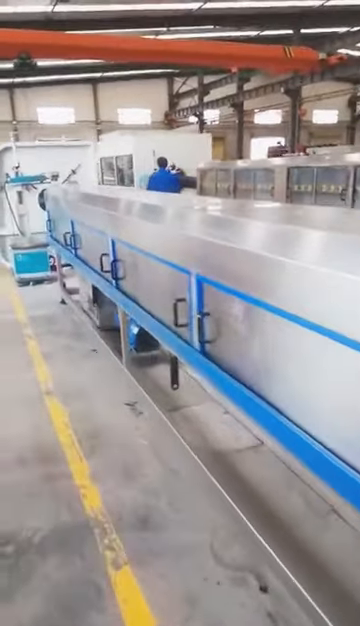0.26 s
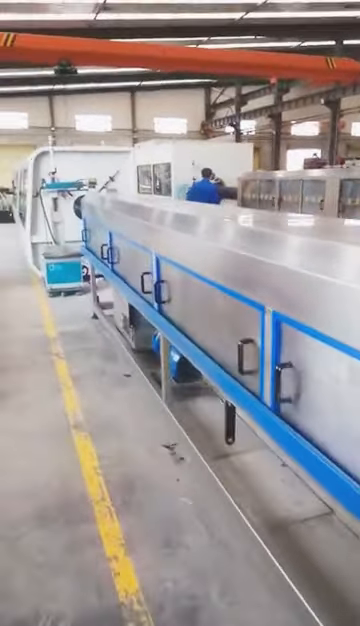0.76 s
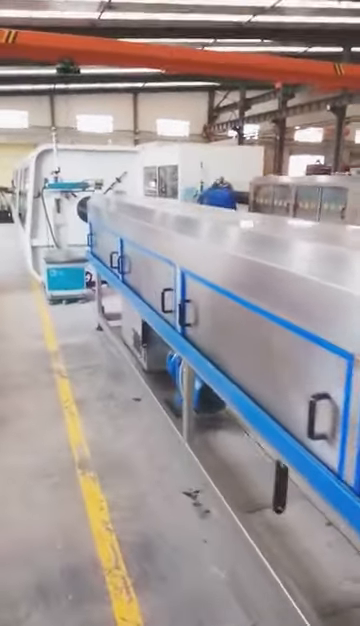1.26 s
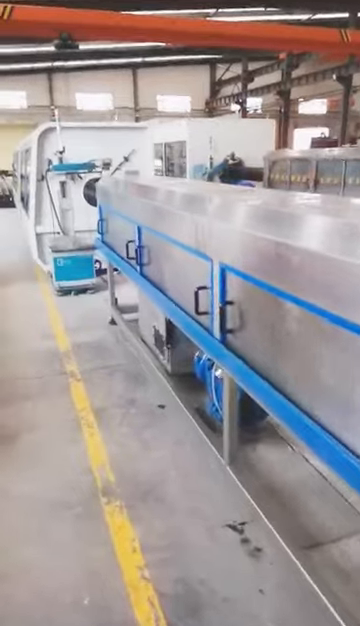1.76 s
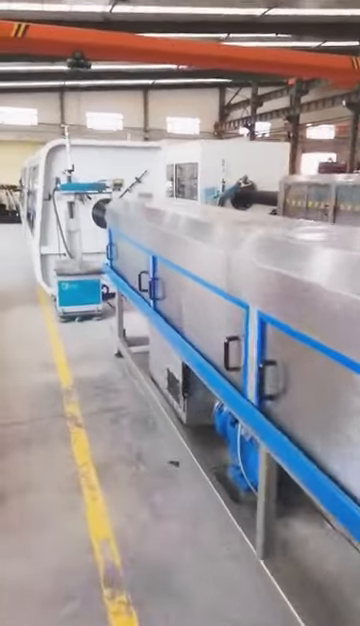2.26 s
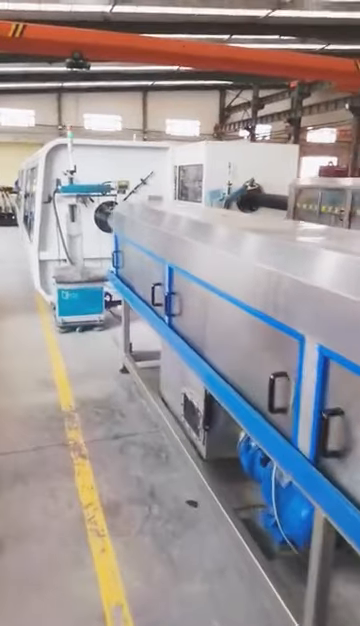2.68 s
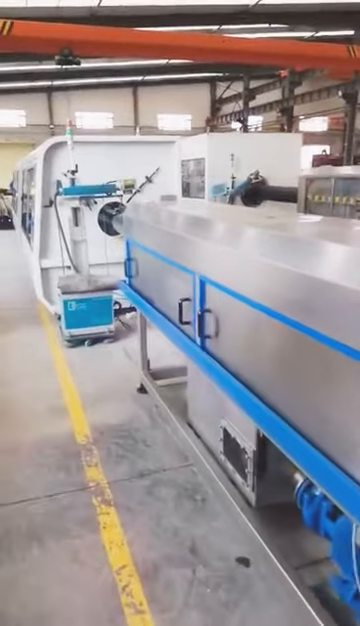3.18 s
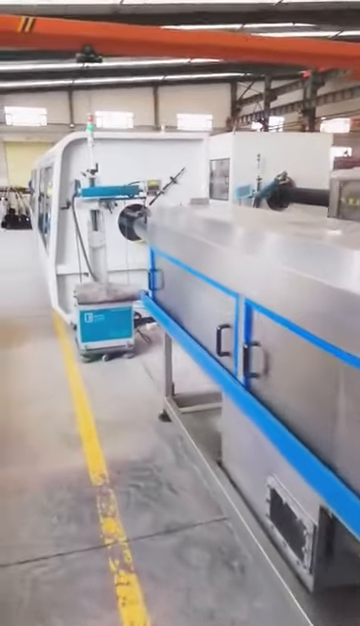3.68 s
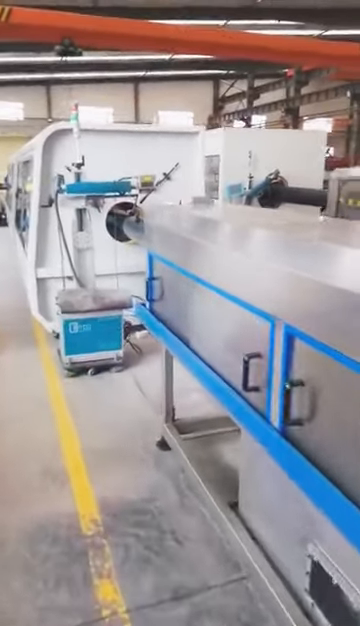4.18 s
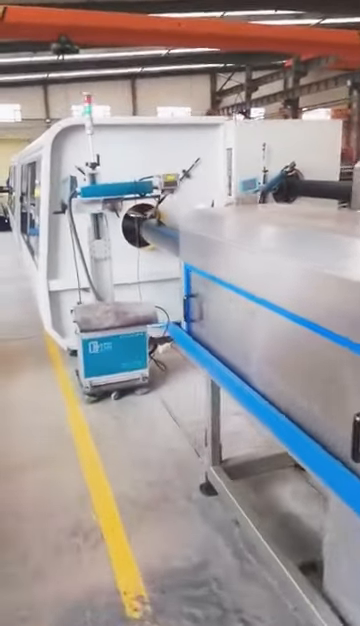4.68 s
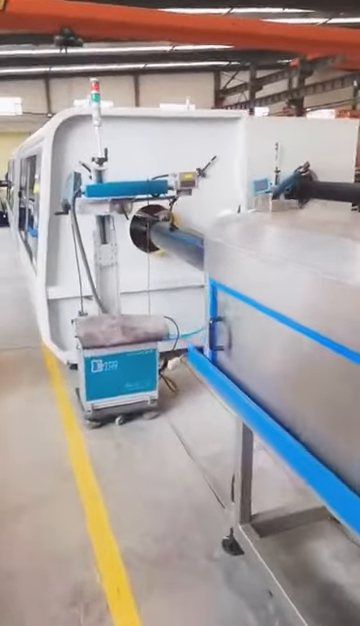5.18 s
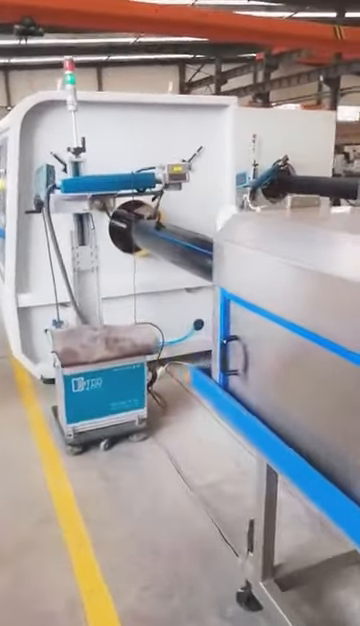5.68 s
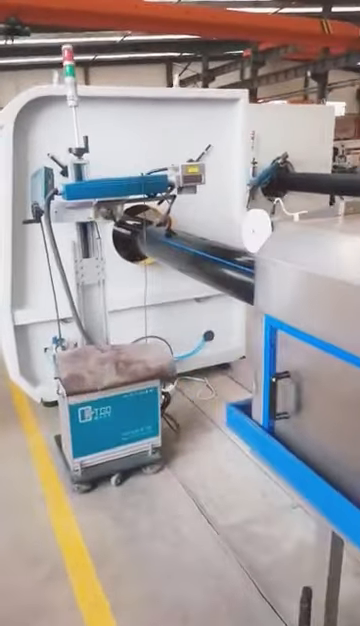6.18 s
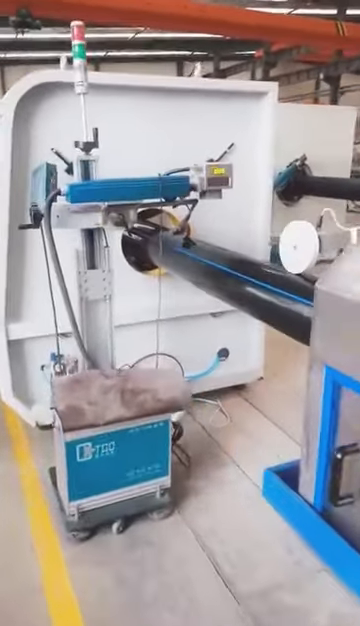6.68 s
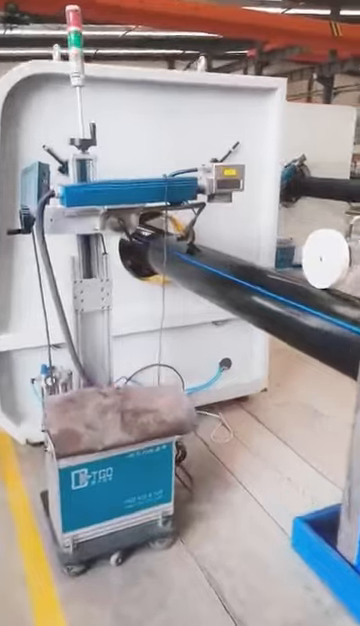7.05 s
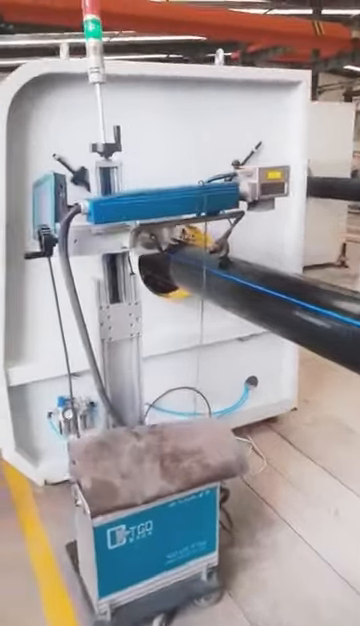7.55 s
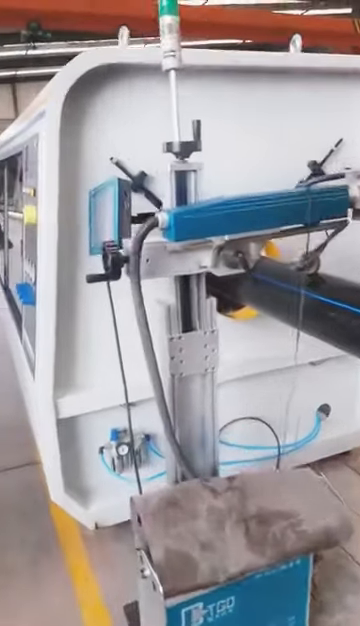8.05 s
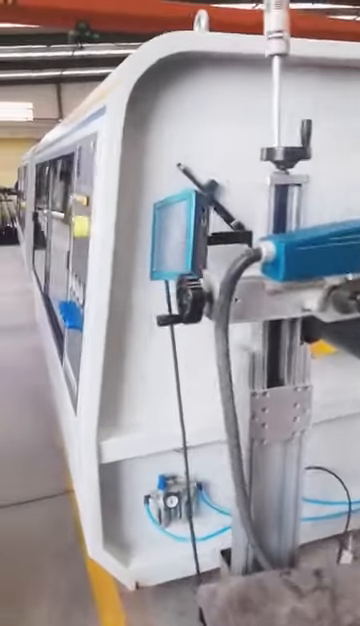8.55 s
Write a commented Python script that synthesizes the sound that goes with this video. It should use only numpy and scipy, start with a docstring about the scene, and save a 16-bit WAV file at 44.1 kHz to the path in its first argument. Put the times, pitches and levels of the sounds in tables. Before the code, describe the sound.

Walking along a pipe production line in a large, hard hall. A constant broad roar of fans, pumps and water spray fills everything from start to end. Over it a clear mid-pitched motor whine rises and dips several times a second, shifting left and right, with lower hums and a faint mains buzz beneath. Handheld stereo phone microphone, left side brighter and hissier.

```python
"""Walk along a pipe extrusion line

A phone is carried along the line in a large hall. Shaped noise makes the roar of fans, pumps and cooling spray,
with patches that grow louder and quieter. Over it, sines make the mains hum and three strong machine tones, which
swell and fade as the walk crosses their reflections; clusters of Doppler-shifted partials make fainter motor and
gear tones that beat. The left microphone is brighter and its port rings in the treble."""
import sys
import numpy as np
from scipy import signal
from scipy.fft import irfft
from scipy.io import wavfile
from scipy.ndimage import map_coordinates

SR = 44100
rng = np.random.default_rng(int(sys.argv[2]) if len(sys.argv) > 2 else 0)


def dump_mix(stems):
    """Bounce the given channels to the path in sys.argv[1] as a 16-bit WAV at rate SR."""
    frames = np.atleast_2d(stems).T  # one column per channel
    limited = np.clip(frames, -1, 1)  # hard clip at full scale
    pcm = np.round(limited * 32767).astype(np.int16)
    wavfile.write(sys.argv[1], SR, pcm)


N = 388962

# Roar of fans, pumps and spray at the right microphone, before its port and the patches.
# Each row: frequency in Hz, level in dB per Hz.
ROAR_SPECTRUM = [(25, -84), (60, -77), (200, -69.5), (350, -66.5), (480, -70), (750, -66), (800, -71),
                 (900, -70), (1450, -81), (1650, -77.5), (1950, -81.5), (2600, -79), (3300, -79.5),
                 (4100, -88)]
# Tone balance of the left microphone over the right, before the ports. Each row: frequency in Hz, gain in dB.
LEFT_OVER_RIGHT = [(60, -2), (170, 1.5), (300, 2.5), (550, 1), (900, 2), (1500, 6), (1950, 2), (2600, 6.5),
                   (3500, 4.5), (6000, 14.5), (7400, 4.5)]
# Likeness of the sound on the two sides. Each row: frequency in Hz, likeness from 0 to 1.
SIDE_LIKENESS = [(50, 0.96), (150, 1), (300, 0.68), (500, 0.64), (700, 0.3), (900, 0.02)]
# Swell of the roar as the walk moves on. Each row: time in seconds, gain in dB.
ROAR_SWELL = [(0, 1.5), (3, 0.23), (6, 0.5), (8.82, -0.1)]
# Mains hum. Each row: time in seconds, level in dB.
MAINS_SWELL = [(0.0, -65.5), (1.26, -58), (1.54, -58.5), (2.88, -54.1), (3.66, -67.3), (4.2, -63.2),
               (4.48, -73.5), (5.44, -64), (6.1, -54), (7.54, -66), (8.38, -56.5), (8.8, -59.5)]
# Multiples of a pump's shaft rate that ring. Each row: multiple of the shaft rate, mean level of the sides in dB.
SHAFT_PARTIALS = [(3, -62), (7, -52), (12, -58.5), (17, -58), (18, -64), (19, -52.5), (21, -55),
                  (24, -53.5), (26, -55.5), (29, -60), (31, -67), (34, -63), (35, -57), (36, -58.5),
                  (41, -69), (44, -68), (46, -67), (49, -62), (51, -58), (52, -64), (53, -66), (54, -56),
                  (56, -66), (57, -65), (61, -65)]
# Fainter tones of other motors and gears. Each row: frequency in Hz, mean level of the sides in dB.
FAINT_TONES = [(245, -54), (292, -52), (377, -57), (401, -54.5), (497, -55), (513, -58), (579, -57),
               (627, -59.5), (729, -52), (992, -56.5), (1024, -64), (1108, -60.5), (1266, -64),
               (1345, -61.5), (1363, -61), (1382, -61), (2595, -63), (2720, -61)]
# The three strong tones at the loud and quiet spots of the walk, before they stray and flutter.
# Each row: time in seconds, level in dB, left over right in dB.
WHINE_SPOTS = [(0.0, -44, -3.0), (0.08, -33.0, 9.0), (0.18, -46, -8), (0.38, -31, 0), (0.54, -39.0, 20),
               (0.88, -41.5, -5.0), (1.18, -33.5, -2.0), (1.4, -28, 4.5), (1.62, -30.5, 5),
               (1.7, -36, -8.0), (2.38, -44, -4), (2.52, -31.5, 3), (2.62, -40.5, -16.0),
               (2.8, -31.5, -8.0), (2.88, -53.0, -14.0), (3.14, -37.0, -15.0), (3.22, -32.5, 8),
               (3.52, -42, 1), (3.68, -29.5, 5.5), (3.9, -61, 20), (3.96, -50, -19.0), (4.12, -30, 14.0),
               (4.2, -52, 7.0), (4.26, -36, -16.0), (4.36, -29, -3.0), (4.56, -50, -19.0),
               (4.84, -31.5, -16.0), (4.94, -28.5, -2.5), (5.06, -34.0, 20), (5.26, -33.5, -5.0),
               (5.5, -40, 20), (5.56, -54, -19.0), (5.66, -30.0, -11), (5.86, -43.5, -2.0),
               (5.96, -44, -19.0), (6.14, -27.0, -1.5), (6.48, -34.0, -5.0), (6.78, -30.0, 0.0),
               (7.02, -42.0, -7), (7.16, -36.5, -11.0), (7.36, -52.0, -2.5), (7.48, -34.5, 0),
               (7.8, -30, 5.0), (7.88, -38, 6.0), (7.96, -29.5, -1.5), (8.06, -41.5, -0.0),
               (8.24, -31, 5.0), (8.34, -34, 5.0), (8.42, -27, -4.0), (8.52, -35, 2.0), (8.62, -33, -21),
               (8.82, -34, -19.0)]
HUM_SPOTS = [(0.0, -55, 6.0), (0.16, -49, 19.0), (0.64, -61.5, 19.0), (0.86, -51, 18), (1.42, -60, 18.5),
             (1.98, -47.5, 3.5), (2.58, -63, 15.0), (2.68, -62.0, -9.0), (3.06, -47.5, 4.0),
             (4.82, -47.5, 10.0), (5.08, -41, 5.0), (6.18, -54.0, -4.0), (6.76, -44.0, 5.0),
             (6.98, -40.5, 2), (7.62, -53, 19.0), (7.82, -64, -11), (8.1, -50.0, -17.0), (8.42, -60, 3.0),
             (8.7, -47.0, 3.0), (8.82, -50, 1.0)]
DRONE_SPOTS = [(0.0, -47, 11.0), (0.18, -63, 13), (0.48, -40.0, 7.0), (0.68, -56, 10), (0.9, -36.5, 9.0),
               (1.06, -52, 5), (1.54, -41.5, 0.0), (1.8, -49, 5), (2.06, -44.5, 20), (2.18, -49.0, -7.0),
               (2.52, -41.5, 5.0), (2.82, -52, 9.0), (2.96, -40.5, 5), (3.34, -58, 5.0), (3.62, -44.5, 7.0),
               (3.8, -59.5, 9.0), (3.96, -61, 19.0), (4.34, -46.5, 3), (4.64, -53.0, -1.0), (6.3, -47.5, 3),
               (6.42, -60.0, -5.0), (6.66, -43.0, 4), (7.08, -54.0, 20), (7.72, -51, 6.5),
               (7.92, -43.0, 9.0), (8.16, -49, 11.0), (8.3, -48, -7), (8.82, -48.0, 10.0)]
# Treble resonance of each microphone port, left then right.
# Each row: centre in Hz, width of one filter pass in Hz, lift at the centre in dB.
PORT_RESONANCES = [(5400, 1110, 8.5), (5240, 2500, 3.5)]

WHINE_HZ, HUM_HZ, DRONE_HZ = 719.9, 300.3, 367.8
MAINS_HZ, SHAFT_HZ = 49.8, 47.49
# sideways waves, opposed on the two sides
ACROSS_WHINE_DB, ACROSS_HUM_DB, ACROSS_DRONE_DB = -44, -59.5, -59.5
WALK_M_S, SOUND_M_S = 1.0, 343
TOP_HZ = 7490  # upper edge of the passband


def undb(db):
    """Gain of a level in dB."""
    return 10 ** (np.asarray(db) / 20)


def read(table, hz):
    """Value of a table at a frequency, straight between rows on a log-frequency axis."""
    points = np.array(table)
    return np.interp(np.log(hz), np.log(points[:, 0]), points[:, 1])


def wander(rate):
    """Smooth random drift with about rate new targets a second; spread near 1."""
    targets = rng.standard_normal(400)
    place = np.arange(0, N, 64) / SR * rate
    drift = 1.2 * map_coordinates(targets, [place], order=3)
    return drift.repeat(64)[:N]  # each value held for 64 samples


def patches(shape, hz_steps, time_steps):
    """Smooth chance over pitch and time, in patches so many steps wide; spread near 1."""
    patch_size = np.array([hz_steps, time_steps])[:, None, None]
    grid = np.mgrid[:shape[0], :shape[1]] / patch_size
    return 1.5 * map_coordinates(rng.standard_normal(shape), grid, order=1)


def roar(broad_db=0.57, patchy_db=3.0, patchy_from_hz=1300.0, patchy_to_hz=2500.0):
    """Noise of many machines; the moving phone meets patches of louder and quieter sound, each side its own."""
    white = rng.standard_normal((2, N))
    hz, _, noise = signal.stft(white, SR, nperseg=1024, noverlap=768)
    hz = np.maximum(hz, 1)[:, None]
    shared, own = noise * np.sqrt(SR / 2)  # unit power per Hz
    alike = np.clip(read(SIDE_LIKENESS, hz), 0, 1)
    left = undb(read(ROAR_SPECTRUM, hz) + read(LEFT_OVER_RIGHT, hz)) * shared
    right = undb(read(ROAR_SPECTRUM, hz)) * (alike * shared + np.sqrt(1 - alike ** 2) * own)

    # fine patches fade out toward bass and hiss
    reach = np.clip(np.minimum(hz / patchy_from_hz, patchy_to_hz / hz), 0, 1)
    broad = broad_db * patches(shared.shape, 25., 45.)  # the same on both sides
    sides = []
    for side in (left, right):
        fine = patchy_db * reach * patches(shared.shape, 2.2, 9.)
        sides.append(side * undb(broad + fine))
    return signal.istft(np.array(sides), SR, nperseg=1024, noverlap=768)[1][:, :N]


def mains():
    """Low hum, longer in wavelength than the phone, so the same on both sides."""
    t = np.arange(N) / SR
    s, db = np.transpose(MAINS_SWELL)
    level = np.interp(t, s, undb(db))
    return np.sqrt(2) * level * np.sin(2 * np.pi * MAINS_HZ * t)


def faint(hz, db, count=24):
    """Tones arriving by several paths, each Doppler-shifted by the walk, so that they beat and fade."""
    spectrum = np.zeros((2, N // 2 + 1), complex)
    for f, level_db in zip(hz, db):
        alike = np.clip(read(SIDE_LIKENESS, f), 0, 1)
        heading = np.cos(np.pi * rng.random(count)) ** 3  # most paths cross the walk sideways
        shift = f * WALK_M_S / SOUND_M_S * heading
        bins = np.round((f + shift) * N / SR).astype(int)
        shared, own = np.exp(2j * np.pi * rng.random((2, count)))  # random phase of each path
        sides = np.array([shared, alike * shared + np.sqrt(1 - alike ** 2) * own])
        half_tilt_db = np.array([[1], [-1]]) * read(LEFT_OVER_RIGHT, f) / 2
        partials = undb(level_db + half_tilt_db) * sides
        for side in range(2):
            np.add.at(spectrum[side], bins, partials[side])
    return irfft(spectrum, N) * N / np.sqrt(2 * count)


def lobes(s, size):
    """Quarter sines between the rows, as across a standing wave: round at the loud spots, sharp at the nulls."""
    place = np.interp(np.arange(N) / SR, s, np.arange(len(s)))
    row = np.minimum(place.astype(int), len(s) - 2)
    start, end = size[row], size[row + 1]
    turn = (place - row) * np.pi / 2
    curve = np.where(end > start, np.sin(turn), 1 - np.cos(turn))
    return start + (end - start) * curve


def strong(hz, spots, across_db, waver_hz=.8, flutter_db=.7, stray_db=1.2):
    """A tone that swells and fades from loud spot to null; a sideways wave sets the sides apart."""
    t = np.arange(N) / SR
    s, db, pan_db = np.transpose(spots)
    size = lobes(s, undb(db)) * undb(stray_db * wander(6))  # weaker paths make it stray
    lean = np.interp(t, s, (undb(pan_db) - 1) / (undb(pan_db) + 1))  # -1 right, 1 left
    phase = 2 * np.pi * np.cumsum(hz + waver_hz * wander(3)) / SR
    turns_per_s = hz * WALK_M_S / SOUND_M_S * 2  # twice a wavelength walked
    across = undb(across_db) * wander(turns_per_s) * np.cos(phase)
    tone = size * np.sin(phase)
    left = tone * (1 + lean) * undb(flutter_db * wander(14)) + across
    right = tone * (1 - lean) * undb(flutter_db * wander(14)) - across
    return np.sqrt(2) * np.array([left, right])


def scene():
    """Roar, mains hum, many faint tones and three strong ones."""
    swell = undb(np.interp(np.arange(N) / SR, *np.transpose(ROAR_SWELL)))
    background = swell * roar() + mains()

    multiple, shaft_db = np.transpose(SHAFT_PARTIALS)
    pump = faint(multiple * SHAFT_HZ, shaft_db)
    motors_and_gears = faint(*np.transpose(FAINT_TONES))

    whine = strong(WHINE_HZ, WHINE_SPOTS, ACROSS_WHINE_DB)
    hum = strong(HUM_HZ, HUM_SPOTS, ACROSS_HUM_DB)
    drone = strong(DRONE_HZ, DRONE_SPOTS, ACROSS_DRONE_DB)
    return background + pump + motors_and_gears + whine + hum + drone


def record(dry):
    """Each microphone port lifts a band of treble; a steep low-pass cuts the top."""
    wet = []
    for side, (hz, width, db) in zip(dry, PORT_RESONANCES):
        peak = signal.iirpeak(hz, hz / width, fs=SR)
        ring = signal.lfilter(*peak, signal.lfilter(*peak, side))  # two passes
        wet.append(side + (undb(db) - 1) * ring)
    low_pass = signal.ellip(14, .3, 70, TOP_HZ, fs=SR, output="sos")
    return signal.sosfilt(low_pass, np.array(wet))


dry = scene()
out = record(dry)
dump_mix(out)
```